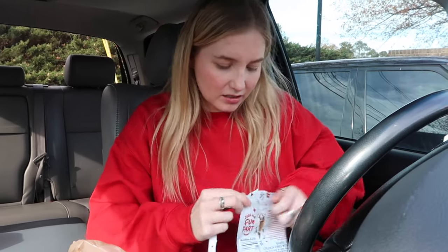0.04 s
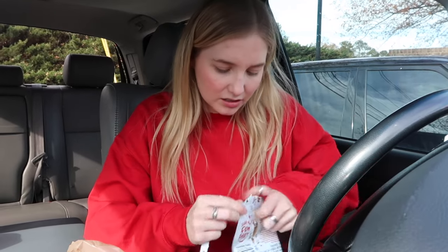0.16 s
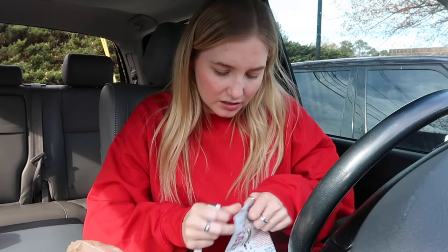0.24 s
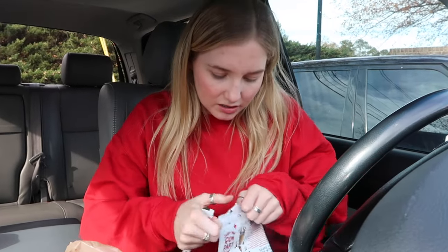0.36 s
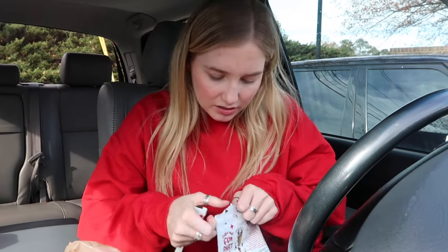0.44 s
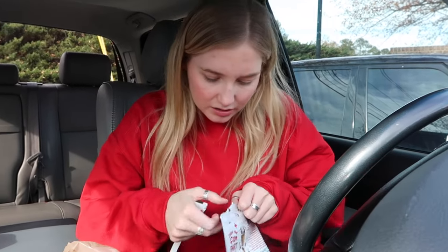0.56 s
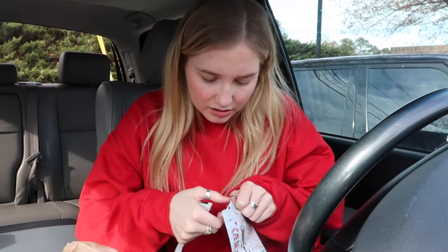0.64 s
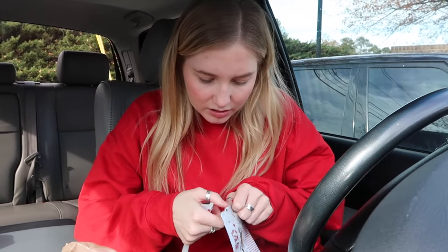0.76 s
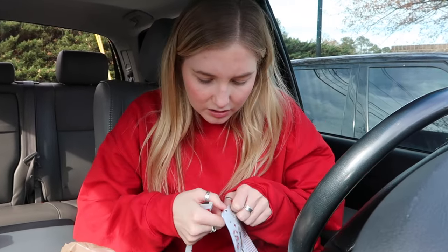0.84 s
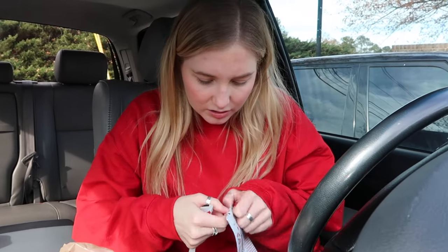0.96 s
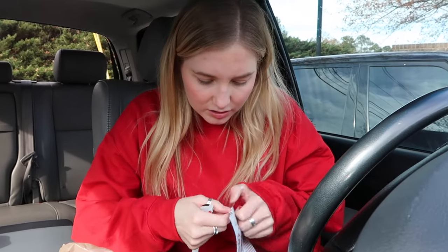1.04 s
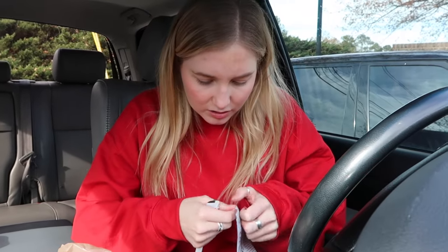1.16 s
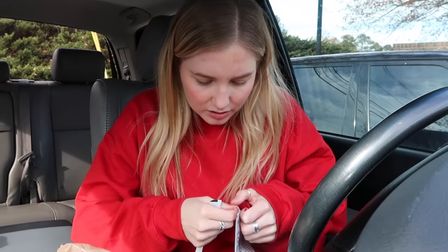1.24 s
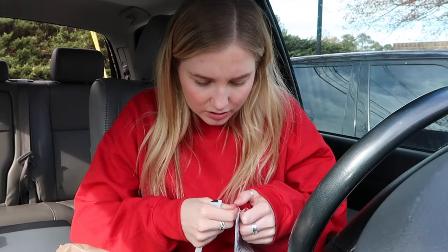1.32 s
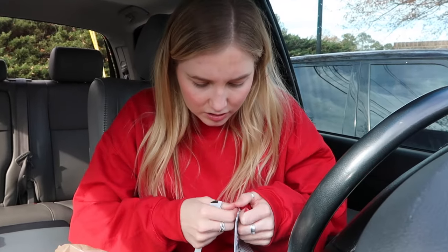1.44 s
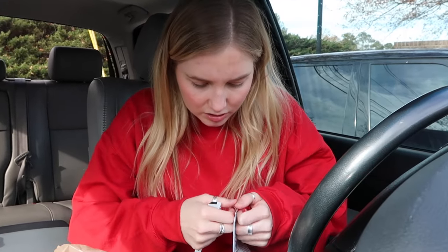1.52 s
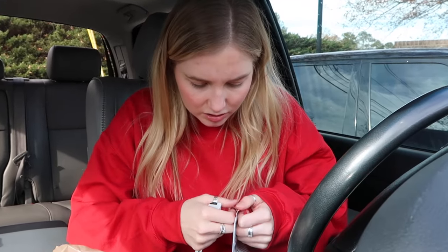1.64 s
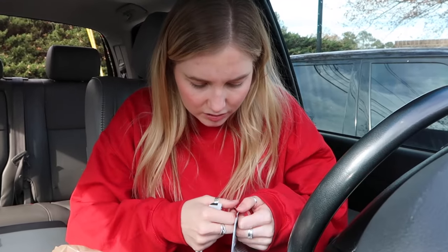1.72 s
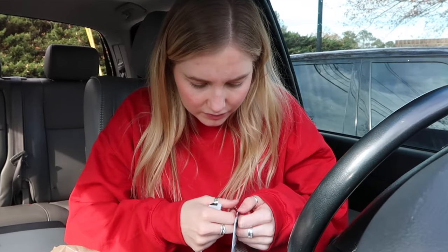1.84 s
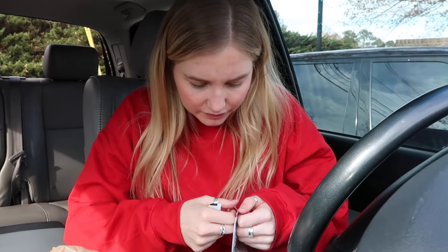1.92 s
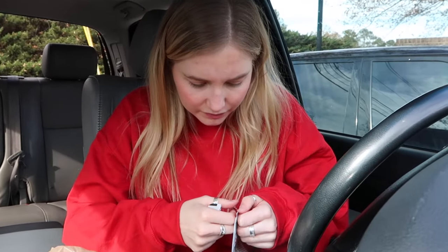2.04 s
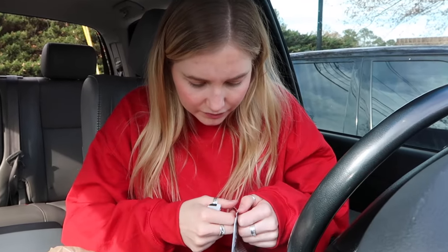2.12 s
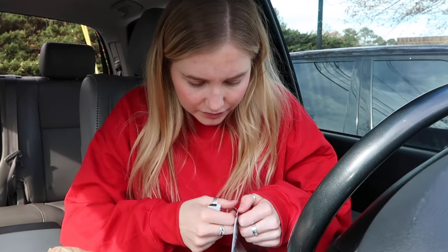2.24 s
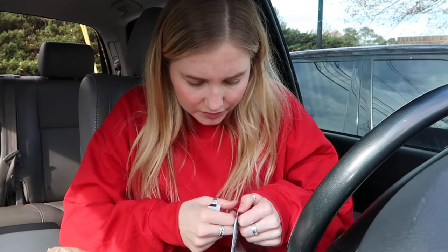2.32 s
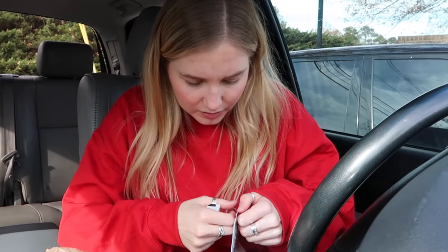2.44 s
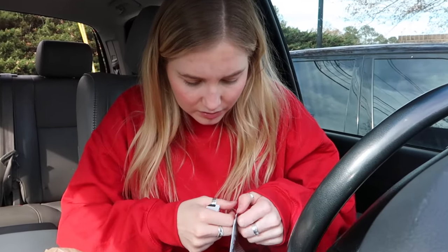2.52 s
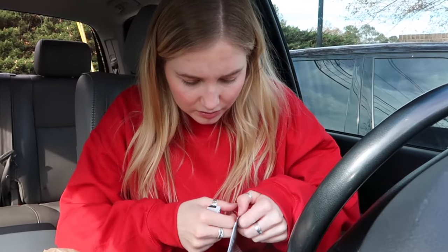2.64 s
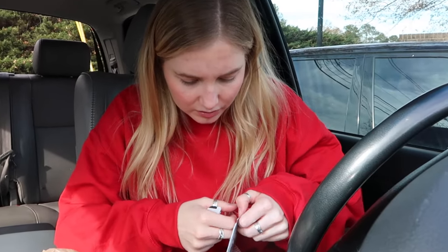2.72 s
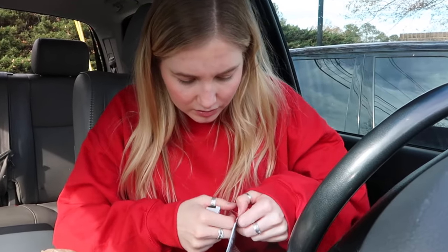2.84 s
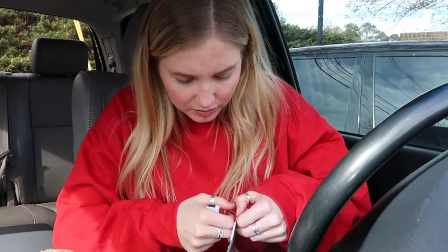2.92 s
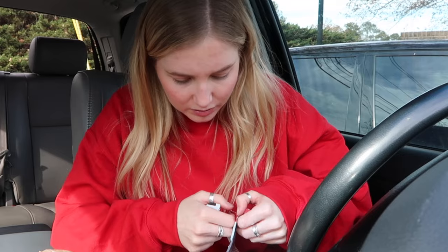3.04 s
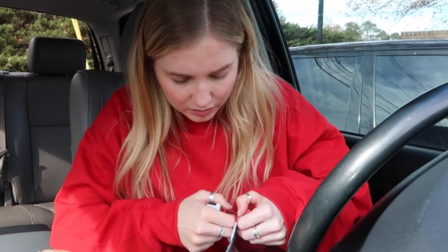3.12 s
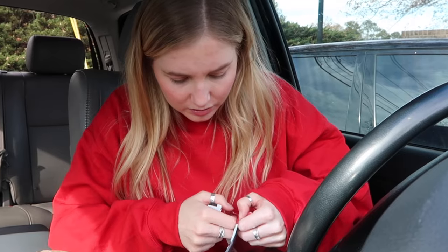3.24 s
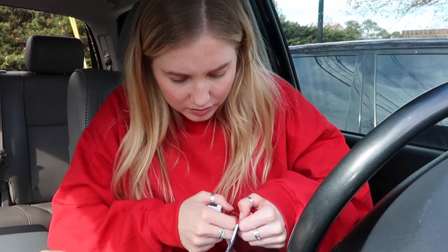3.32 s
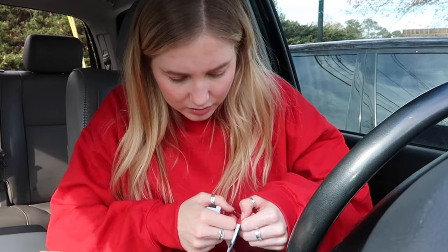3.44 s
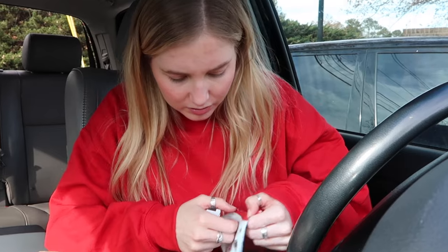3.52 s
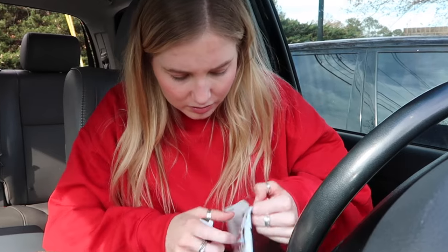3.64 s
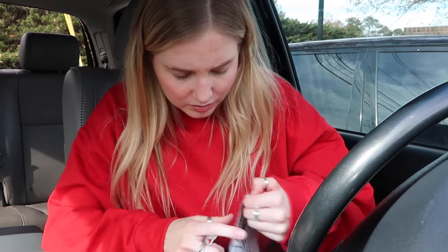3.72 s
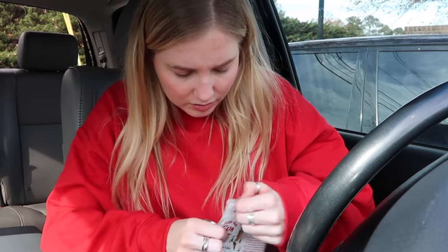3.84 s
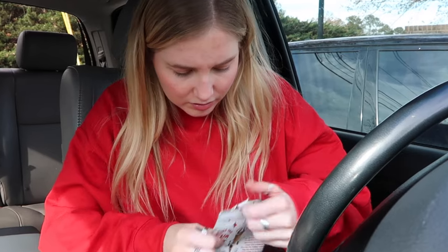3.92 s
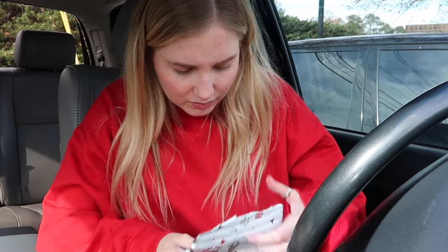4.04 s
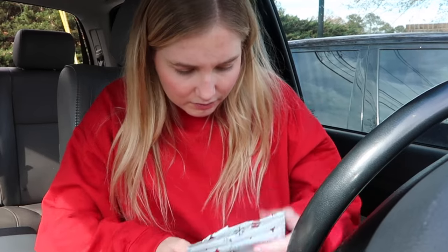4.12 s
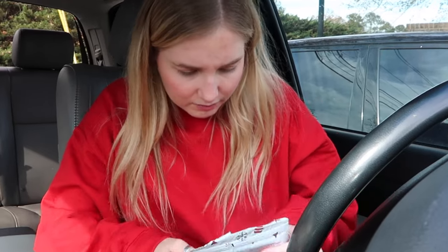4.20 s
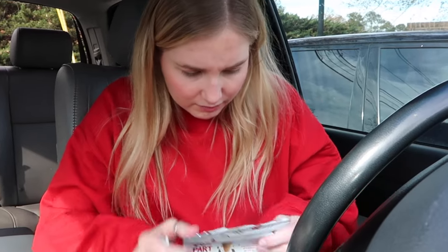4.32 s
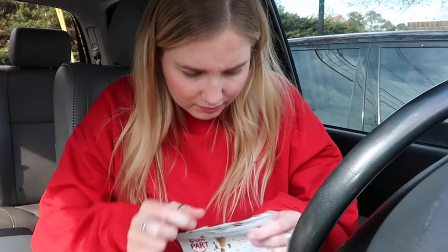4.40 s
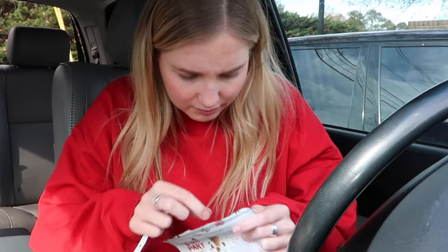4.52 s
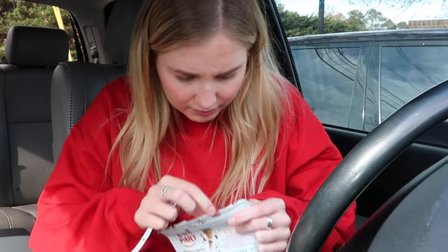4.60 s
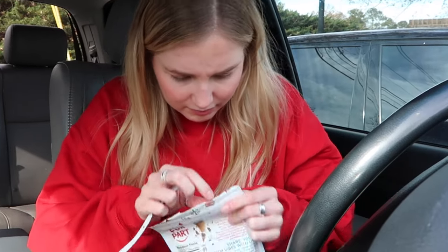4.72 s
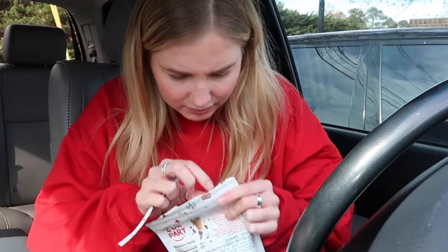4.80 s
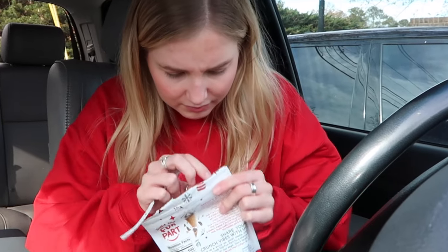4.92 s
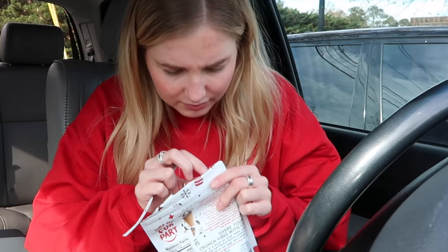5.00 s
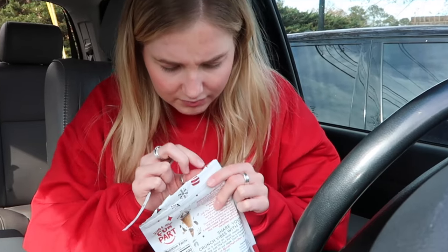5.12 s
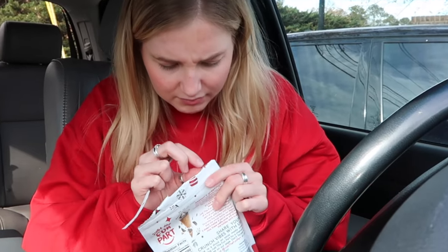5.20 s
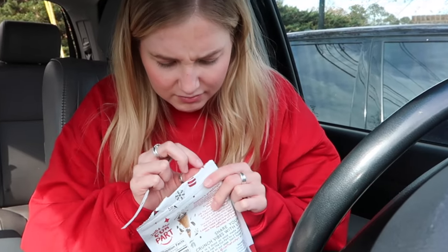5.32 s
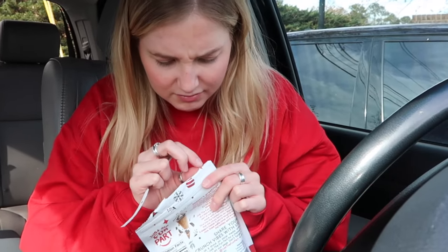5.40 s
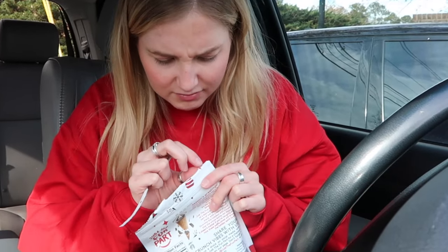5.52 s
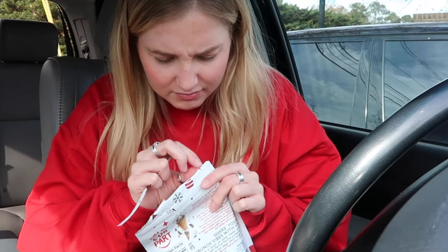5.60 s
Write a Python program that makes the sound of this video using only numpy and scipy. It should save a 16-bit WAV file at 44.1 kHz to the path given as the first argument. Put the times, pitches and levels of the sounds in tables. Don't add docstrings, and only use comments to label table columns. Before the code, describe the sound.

A stiff plastic snack bag crackles and rustles in irregular bursts inside a parked car, with a quieter stretch midway, over low engine rumble.

```python
import sys
import numpy as np
from scipy import signal
from scipy.fft import rfft, irfft, next_fast_len
from scipy.io import wavfile

SR = 44100
rng = np.random.default_rng(int(sys.argv[2]) if len(sys.argv) > 2 else 0)


def gain_from_decibels(decibels):
    exponent = np.asarray(decibels, float) / 20
    return 10 ** exponent


def unload_audio(sound):
    columns = np.transpose(np.atleast_2d(sound))
    steps = np.round(np.clip(columns, -1, 1) * 32767)
    wavfile.write(sys.argv[1], SR, steps.astype(np.int16))


N = 249606

# frequency in Hz, density in dB per Hz.
AIR_SPECTRUM = [(12, -32), (20, -2), (49, -3.5), (112, -11), (144, -12), (185, -11), (342, -21.5),
                (505, -22), (705, -28.5), (1410, -29.5), (1540, -31), (3750, -37), (12400, -45),
                (13500, -44), (15500, -87)]
# frequency in Hz, left-right likeness, clipped to -1 to
AIR_COHERENCE = [(30, 0.98), (60, 1), (130, 1), (290, 0.25), (640, -0.22), (3100, 0.12), (7000, 0.044),
                 (15000, -1.7)]
# time in seconds, level in dB.
IDLE_SWELL = [(0.0, -47), (0.5, -50.5), (0.53, -50.5), (1.69, -49), (1.95, -46.5), (2.28, -49),
              (5.01, -47.5), (5.66, -49.5)]
# time in seconds, rustle level in dB.
HAND_MOTION = [(0.0, -50.5), (0.55, -51), (0.68, -53), (1.09, -54), (1.64, -65.5), (3.41, -69),
               (3.77, -46.5), (4.11, -48.5), (4.27, -44.5), (4.65, -51.5), (5.25, -70.5), (5.66, -69)]
# start in seconds, length in seconds, lift of the rustle in dB.
HAND_DRAGS = [
    (0.255, 0.17, 10),
    (0.619, 0.15, 11),
    (0.954, 0.091, 4.5),
    (3.586, 0.1, 9.5),
    (3.836, 0.095, 11),
    (4.33, 0.13, 5.5),
    (4.57, 0.1, -6),
    (4.911, 0.21, 12.5),
]
# folds in dB, low panels in dB, crisp top in dB.
RUSTLE_LAYERS_DB = (-9, -8.5, -18.5)
# low edge in Hz, high edge in Hz.
FILM_MODE_BANDS = [
    (260, 1100),
    (750, 2300),
    (2100, 5000),
    (5600, 13500),
]
# start in seconds,
# peak in dB, brightness in dB, crispness in dB.
BUCKLES = [(0.03, -33, -29, -27), (0.059, -24, 0.5, -7.5), (0.073, -29.5, -6, -1.5),
           (0.133, -35, -7, -11), (0.231, -16, -4, -28), (0.247, -25, -1.5, -20),
           (0.28, -16.5, -8.5, -14.5), (0.3, -19.5, -2.5, -13), (0.313, -20.5, -13.5, -20),
           (0.334, -26.5, -0.5, -12), (0.37, -17, 5, -2), (0.445, -35, -4.5, -19),
           (0.525, -43, -2, -18), (0.608, -23.5, -2.5, -17.5), (0.691, -26, -14, -31),
           (0.735, -31, 2, -21), (0.877, -40.5, 3.5, -8), (0.948, -29, -13, -31),
           (0.984, -28.5, -13.5, -21.5), (1.041, -32.5, -12, -23), (1.055, -30, 4, -8),
           (1.067, -33, 7, -6.5), (1.098, -26, -16, -28), (1.139, -48, 4, -7),
           (1.221, -24.5, -1, -9.5), (1.238, -23.5, -3, -10.5), (1.295, -21, -4.5, -18),
           (1.397, -40, -2.5, -10.5), (1.511, -48.5, 3, -2.5), (1.523, -34, -4, -12),
           (1.876, -48, 1.5, -6), (1.89, -37, -10, -3.5), (2.061, -50.5, -9, -6.5),
                (2.133, -40.5, -39, -34), (2.301, -52.5, -6, -4), (2.673, -35, -7.5, -45),
                (2.8, -50.5, -8, -23), (2.916, -55, 5.5, -23), (2.933, -30, -7.5, -36),
                (2.95, -33, -21, -33), (3.058, -42, -21, -28), (3.16, -37.5, -21, -37),
                (3.209, -46, -25, -27), (3.296, -48, -19, -33), (3.348, -29, -9, -25),
                (3.383, -34, -9.5, -18), (3.44, -34.5, -7, -19), (3.515, -32.5, -6.5, -16),
                (3.553, -34, -4.5, -12.5), (3.576, -31.5, 3.5, -6.5),
           (3.601, -16.5, -5, -14), (3.617, -15.5, -7, -21), (3.66, -18.5, -16, -35),
                (3.673, -23, -6, -30), (3.71, -37, 1, -29), (3.755, -22.5, 1.5, -12), (3.766, -22, -2, -3),
                (3.823, -14, -10, -36), (3.855, -16.5, -7.5, -40), (3.877, -16, 0, -21),
                (3.886, -19, -5, -11), (3.903, -21.5, 1, -19), (3.913, -16, 0, -15.5),
                (4.04, -33, -10, -25), (4.067, -21.5, 0, -5), (4.109, -26.5, -14, -28),
                (4.148, -30.5, -13, -21), (4.175, -23, -14, -26.5), (4.25, -14, -23.5, -33),
                (4.31, -13, -6.5, -21.5), (4.321, -7.5, -9.5, -20), (4.344, -17.5, -7.5, -24),
                (4.368, -19, -4.5, -21), (4.554, -16, -3.5, -25.5), (4.917, -47.5, 4, -1),
                (5.083, -27.5, -39, -43), (5.145, -47, 0, -4.5), (5.32, -16, -1, -15.5),
                (5.443, -49, 7.5, -5), (5.522, -44.5, 0, -17)]
# start in seconds, peak in dB, brightness in dB, length in ms.
LONG_SLIPS = [(0.087, -37, -7, 5.9), (0.49, -47, -0.5, 29), (0.658, -33.5, -21, 33),
              (0.711, -26.5, -14, 10), (0.897, -42.5, -7, 18), (1.202, -31.5, -12.5, 4),
              (1.544, -42.5, -3, 29), (1.568, -42.5, -6, 6.7), (3.628, -27.5, -13, 5.8),
              (3.689, -28, -9, 7.3), (3.748, -30.5, -1.5, 11), (3.928, -37, -7, 5.4), (3.971, -43, -9, 10),
              (4.01, -45.5, -2, 17), (4.198, -55, -17, 10), (4.398, -31, -11.5, 3.7),
              (4.439, -34, -13, 6.1), (4.469, -39, -4.5, 12), (4.598, -36.5, -17, 10), (4.659, -53, -5, 27),
              (5.022, -42.5, -4, 33)]
# frequency in Hz, 60 dB decay time in seconds.
CABIN_DECAY = [(200, 0.062), (530, 0.084), (1390, 0.08), (3680, 0.079), (9700, 0.034)]
# frequency in Hz, width in Hz, level in dB.
CABIN_RESONANCES = [(1020, 154, -4), (2900, 730, -12)]
# frequency in Hz, level of the part unlike in the ports in dB.
CABIN_UNLIKE = [(150, -20), (350, -15), (800, -22), (2000, -16), (4500, -8), (9000, -7), (14000, -6)]
# frequency in Hz, lead of the left port in radians.
PORT_LEAD = [(1000, -.12), (3300, -.35), (4500, -.8), (6300, -1.7), (8600, -2.2), (11500, -2.4),
             (16000, -2.5)]

FIRING_HZ, WHINE_HZ = 25, 13012.5
PLACES = 5
LOW_FOLLOWS = 0.66
DRAG_EDGE_S = 0.005
RUB_START_S, RUB_ATTACK_S, RUB_HOLD_S, RUB_RELEASE_S = 0.591, 0.016, 0.15, 0.027
RUB_DB, RUB_SWELL_DB = -57, 5
PANEL_DB, FOLD_DB, CREASE_DB, TOP_DB = -6, -6.5, 0.5, 10
PANEL_PER_BRIGHT_DB = -0.18
PANEL_PER_LEVEL_DB = -0.151
PALM_FROM_S, PALM_DB = 4.0, -3
RATTLE_MS, RATTLE_MS_PER_LEVEL_DB = 4.71, -0.0333
CREAK_SHARE, CRACK = 0.35, 2
SLIP_CRISP_DB, SLIP_CRISP_FOLLOWS = -8, 2.2
RING_CYCLES = 4.1


def rms_one(x):
    return x / np.sqrt(np.mean(x ** 2) + 1e-20)


def in_time(rows):
    s, *columns = np.transpose(rows)
    return [np.interp(np.arange(N) / SR, s, c) for c in columns]


def at_hz(points, hz):
    table = np.array(points)
    return np.interp(np.log(hz), np.log(table[:, 0]), table[:, 1])


def band(x, low_hz, high_hz):
    edges = [low_hz, min(high_hz, .45 * SR)]
    return signal.sosfilt(signal.butter(2, edges, "band", fs=SR, output="sos"), x)


def drift(rate):
    r = np.exp(-80 * np.pi * rate / SR)
    slow = signal.lfilter([1], [1, -2 * r, r * r], rng.standard_normal(N // 40 + 2002))[2000:]
    return np.interp(np.arange(N) / 40, np.arange(len(slow)), rms_one(slow))


def ring(impulses, hz, t60):
    r, w = gain_from_decibels(-60 / (t60 * SR)), 2 * np.pi * hz / SR
    return signal.lfilter([0, np.sin(w)], [1, -2 * r * np.cos(w), r * r], impulses + 1e-18)


def clicks(per_s, spread_db, size):
    draw = rng.random((3, size))
    strength = gain_from_decibels(-spread_db * np.log(draw[1] + 0.0013))
    return (draw[0] < per_s / SR) * strength * np.sign(draw[2] - .5)


def air(patchy_db):
    out, edges, white = 0, 20 * 2 ** np.arange(0, 9.6, .5), rng.standard_normal((2, 2, N + SR))
    swell_db = in_time(IDLE_SWELL)[0]
    for k, (low, high) in enumerate(zip(edges, edges[1:])):
        mid, side = band(white[k % 2], low, high)[:, SR:]
        hz = np.sqrt(low * high)
        alike = np.clip(at_hz(AIR_COHERENCE, hz), -1, 1)
        swell = (swell_db - swell_db.mean()) * (hz < 400)
        gain = gain_from_decibels(at_hz(AIR_SPECTRUM, hz) + swell + patchy_db * drift(12.3))
        out = out + gain * (np.sqrt(1 + alike) * mid + np.sqrt(1 - alike) * side * [[1], [-1]])
    dull = signal.butter(6, 12800, fs=SR, output="sos")
    return gain_from_decibels(swell_db.mean()) * rms_one(signal.sosfilt(dull, out))


def whine(level_db):
    t = np.arange(N) / SR
    flip = np.tanh(3 * np.cos(np.pi * FIRING_HZ * t) ** 3) * gain_from_decibels(1.5 * drift(8))
    return gain_from_decibels(level_db) * flip * np.sin(2 * np.pi * WHINE_HZ * t + np.array([[1.03], [-1.03]]))


def rustle():
    t = np.arange(N) / SR
    busy_db = in_time(HAND_MOTION)[0] + 55
    for s, length_s, lift_db in HAND_DRAGS:
        corners = [-DRAG_EDGE_S, 0, length_s, length_s + DRAG_EDGE_S]
        busy_db = busy_db + lift_db * np.interp(t - s, corners, [0, 1, 1, 0])
    grains = clicks(9000 * gain_from_decibels(3 * drift(25)), 2.5, N)
    pitches, dealt = np.geomspace(300, 5200, 14), rng.integers(0, 14, N)
    rings = sum(ring(grains * (dealt == k), hz, 2.9 / hz) * hz ** 0.18 for k, hz in enumerate(pitches))
    folds = band(rings, 1000, 4000), busy_db
    panels = band(rings, 282, 1290), LOW_FOLLOWS * busy_db
    crisp = band(grains, 4470, 10340), busy_db
    sound = 0
    for (part, db), level_db in zip((folds, panels, crisp), RUSTLE_LAYERS_DB):
        sound = sound + gain_from_decibels(db + level_db - 55) * rms_one(part)
    rub_s = np.cumsum([RUB_START_S, RUB_ATTACK_S, RUB_HOLD_S, RUB_RELEASE_S])
    rub = np.interp(t, rub_s, [0, 1, gain_from_decibels(RUB_SWELL_DB), 0])
    sound += gain_from_decibels(RUB_DB) * rub * rms_one(ring(grains, 2504, 0.037))
    turn = t * 9 - np.arange(PLACES)[:, None]
    weight = np.maximum(np.cos(2 * np.pi * turn / PLACES), 0) ** 2
    return sound * weight / np.sqrt(np.sum(weight ** 2, axis=0))


def injectors(level_db, first_s):
    ticks, draw = np.zeros(N), rng.random((round(N / SR * FIRING_HZ) - 1, 3))
    at = ((first_s + np.arange(len(draw)) / FIRING_HZ) * SR).astype(int)
    ticks[at] = draw[:, 0]
    ticks[at + int(.0065 * SR)] = draw[:, 1] * (draw[:, 2] < .4)
    tick = band(ring(ticks, 4200, .006), 3500, 5200)
    return gain_from_decibels(level_db) * tick * [[1], [-.2]]


def snaps(size=4096):
    lead = 220
    out, ms = np.zeros((PLACES, N + size)), (np.arange(size) - lead) * 1000 / SR
    events = []
    for s, db, bright, crisp in BUCKLES:
        events.append((s, db, bright, crisp, RATTLE_MS + RATTLE_MS_PER_LEVEL_DB * (db + 29)))
    for s, db, bright, length in LONG_SLIPS:
        events.append((s, db, bright, SLIP_CRISP_DB + SLIP_CRISP_FOLLOWS * bright, length))
    for k, (s, db, bright_db, crisp_db, length_ms) in enumerate(events):
        creak = 0.44 * np.exp(ms / (CREAK_SHARE * length_ms))
        shape = np.where(ms < 0, creak, np.exp(-ms / length_ms))
        slips = clicks(6000, 2.5, size) * shape * .2
        slips[lead] = min(CRACK, 5.3 / length_ms)
        at, spread = round((s - .0006) * SR) - lead, rng.random((4, 3))
        panel_db = PANEL_DB + PANEL_PER_BRIGHT_DB * bright_db + PANEL_PER_LEVEL_DB * (db + 51)
        panel_db += PALM_DB * (s > PALM_FROM_S)
        colour_db = panel_db, FOLD_DB, CREASE_DB + bright_db, TOP_DB + crisp_db
        for (low, high), band_db, where in zip(FILM_MODE_BANDS, colour_db, spread):
            pitches = low * (high / low) ** ((np.arange(3) + where) / 3)
            part = band(sum(ring(slips, hz, RING_CYCLES / hz) for hz in pitches) + 3 * slips, low, high)
            part = band(part, low / 2, high * 1.5)
            out[k % PLACES, at:at + size] += gain_from_decibels(db + band_db) * part / np.abs(part).max()
    return out[:, :N]


def cabin(x, wet_db, size=8192):
    t, tail = np.arange(size) / SR, np.zeros((2, PLACES, size))
    edges, white = 100 * 2 ** np.arange(0, 7.6, .5), rng.standard_normal((2, 2, PLACES, size))
    for k, (low, high) in enumerate(zip(edges, edges[1:])):
        hz = np.sqrt(low * high)
        unlike = np.array([1, gain_from_decibels(at_hz(CABIN_UNLIKE, hz))])[:, None, None]
        tail += band(white[k % 2], low, high) * gain_from_decibels(-60 * t / at_hz(CABIN_DECAY, hz)) * unlike
    tail *= (1 - np.exp(-t / 0.00011)) * (1 + 2.2 * np.exp(-t / 0.00053))
    tail *= gain_from_decibels(wet_db) / np.sqrt(np.sum(tail[0] ** 2) / PLACES)
    tail[0, :, 0] += 1
    grid = next_fast_len(N + size)
    hz = np.maximum(np.fft.rfftfreq(grid, 1 / SR), 1)
    alike, unlike = np.sum(rfft(tail, grid) * rfft(x, grid), axis=1)
    lift = 1 + sum(gain_from_decibels(db) / (1 + 1j * (hz - f * f / hz) / w) for f, w, db in CABIN_RESONANCES)
    turn = np.exp(.5j * at_hz(PORT_LEAD, hz))
    ports = np.array([gain_from_decibels(-.45) * (alike * turn + unlike), gain_from_decibels(.45) * (alike / turn - unlike)])
    return irfft(ports * lift, grid)[:, :N]


def scene():
    bag = cabin(snaps() + rustle(), wet_db=0.75)
    return bag + air(patchy_db=3.06) + injectors(level_db=-52, first_s=0.0048) + whine(level_db=-68.5)


def band_limit(x):
    return signal.sosfilt(signal.butter(12, 16470, fs=SR, output="sos"), x)


def record(dry):
    rounded = 1.734 * np.tanh(dry / 1.143)
    return band_limit(rounded)


dry = scene()
out = record(dry)
unload_audio(out)
```